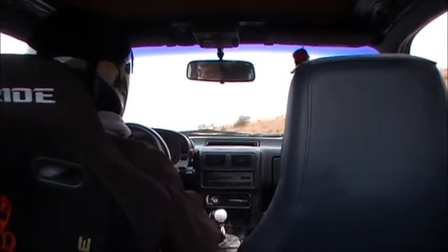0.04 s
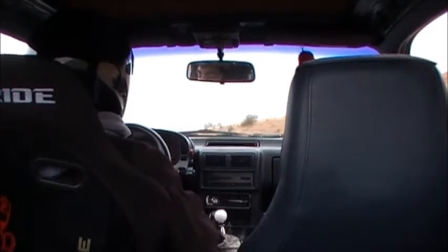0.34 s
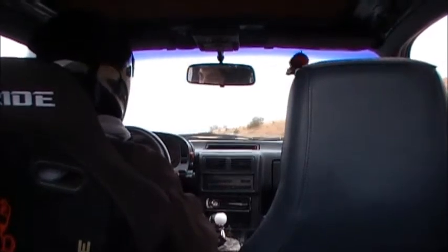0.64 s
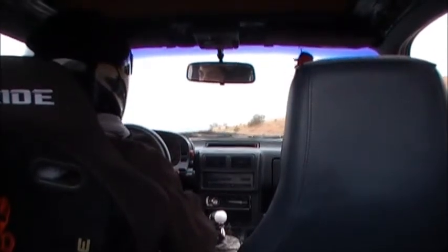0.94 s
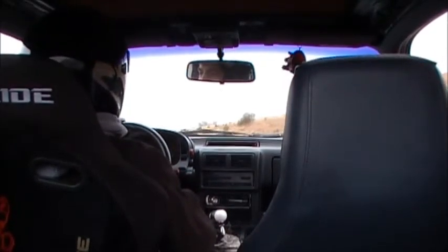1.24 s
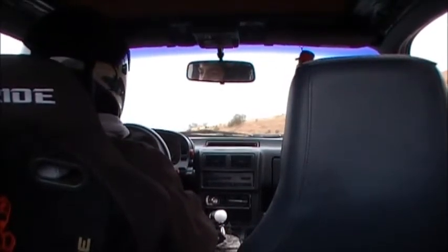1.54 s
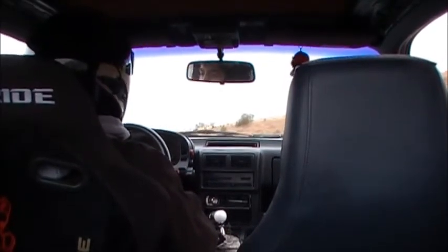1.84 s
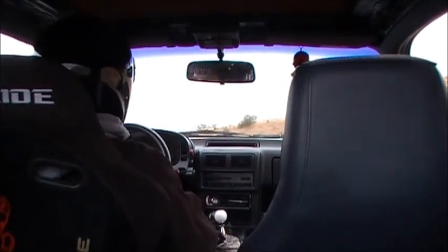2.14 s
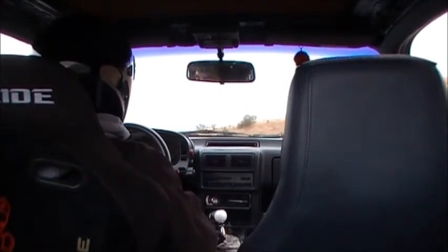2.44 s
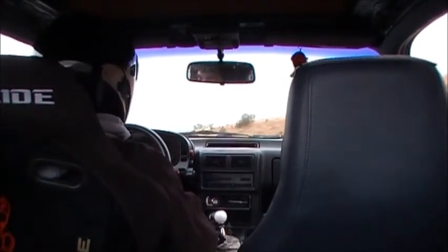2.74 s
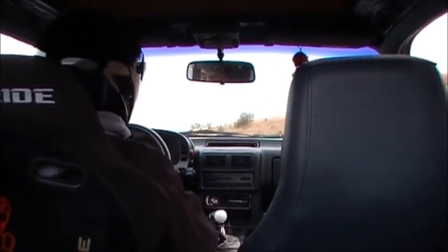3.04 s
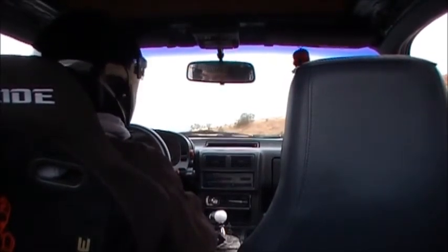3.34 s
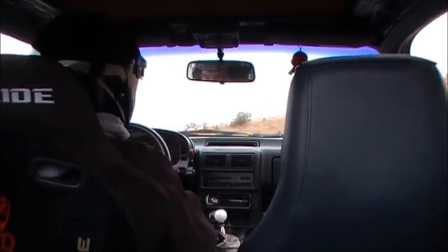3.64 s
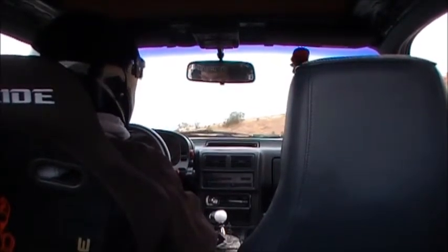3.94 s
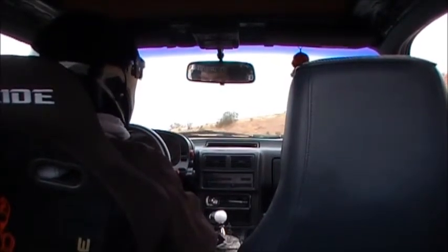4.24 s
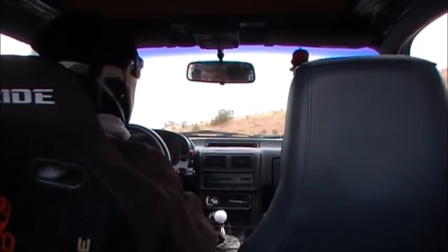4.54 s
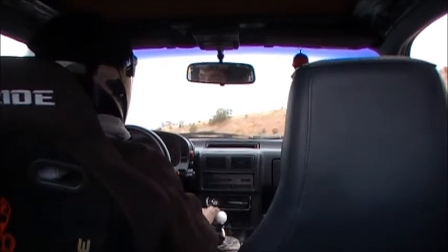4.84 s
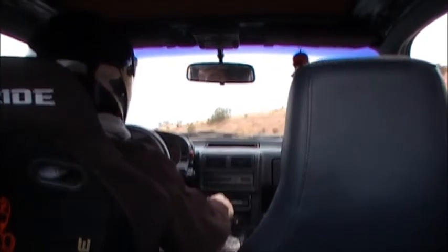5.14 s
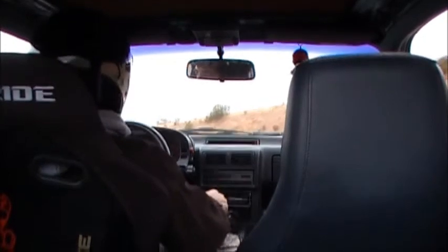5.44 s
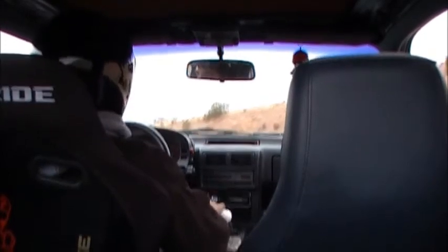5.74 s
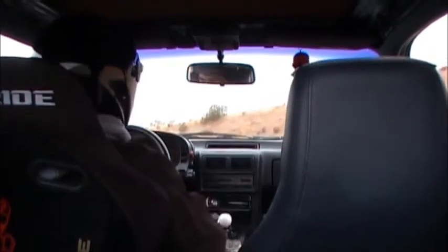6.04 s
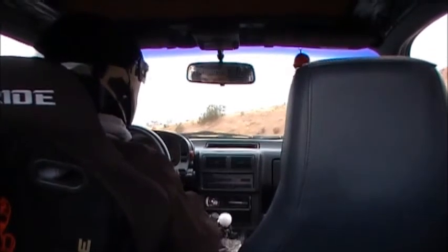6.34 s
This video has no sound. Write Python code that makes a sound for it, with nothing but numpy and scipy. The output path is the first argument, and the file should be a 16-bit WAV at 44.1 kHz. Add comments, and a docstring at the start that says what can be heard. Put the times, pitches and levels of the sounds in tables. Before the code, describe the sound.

The sound is heard inside a stripped car on a rough track. The engine starts low and burbling, and from about 0.5 to 1.7 seconds bucks in quick surges, five or six a second. Around 1.8 seconds it revs up, then holds a loud, resonant drone that creeps higher until 5.4 seconds. It drops away, pops at 5.5 and 5.9 seconds, picks up briefly and bucks again until the end at about 6.4 seconds. Throughout, tyres roar, grit hisses against the floor, the body rumbles and a fuel pump whines steadily underneath. Stones and loose trim knock here and there, most clearly near 0.3, 1.4 and 6.2 seconds. Soft low thumps from bumps come from 4 seconds on. A loose metal clip chatters lightly between 0.4 and 1.2 seconds and more strongly from 5 seconds, joined by three faint, short squeaks.

```python
"""In the back of a stripped car on a rough track, driven by a two-rotor engine.
The engine bucks on a light throttle, pulls up and holds high revs through a slide, then stumbles and pops
as the foot lifts. Its firing orders sweep through the cabin's resonances. Tyres roar and spray grit, the
body rumbles and thumps over bumps, the fuel pump whines, stones knock and a loose metal clip chatters."""
import sys
import numpy as np
from scipy import signal
from scipy.fft import rfft, irfft
from scipy.io import wavfile

SR = 44100
rng = np.random.default_rng(int(sys.argv[2]) if len(sys.argv) > 2 else 0)


def pcm_store(signal):
    """Save signal as 16-bit PCM."""
    levels = np.round(np.clip(np.atleast_2d(signal), -1, 1) * 32767)
    wavfile.write(sys.argv[1], SR, levels.astype(np.int16).T)


N = 282240
TIME = np.arange(N) / SR
BINS_HZ = np.fft.rfftfreq(N, 1 / SR)
STEP = 30  # samples per control point


# Each row: time in seconds, level of the first firing order in dB.
BOOM_LEVEL = [(0, -27.5), (.42, -25.5), (.7, -25), (2.7, -23.5), (5.45, -26), (5.63, -30), (6.08, -23.5),
              (6.4, -21.5)]
# Each row: time in seconds, engine load in dB, firing unevenness as a fraction.
ENGINE_LOAD = [(0, -16.5, 0.37), (.45, -9, 0.2), (1.55, -6, 0.34), (1.71, -1.5, 0.14), (1.83, -7.5, 0.084),
               (1.95, 0, 0.041), (2.1, 2.5, 0.045), (3.2, 3, 0.033), (3.95, 1, .04), (4.2, 3, 0.037),
               (4.33, -2, .05), (4.48, 1.5, 0.038), (5.39, 2, 0.061), (5.47, -6, 0.38), (5.57, -15, 0.17),
               (5.72, -10, 0.16), (5.85, 0.5, 0.19), (6.02, -2, 0.11), (6.15, -6.5, 0.16), (6.4, -7, 0.25)]
# Cabin modes for orders 2 and 3. Each row: centre in Hz, width in Hz, gain in dB.
DRONE_MODES = [(151, 34, -26), (210.8, 17, -23), (228.7, 16.3, -21), (255, 39, -38.5), (294, 32.6, -22.5),
               (315, 21, -27)]
# Cabin modes for higher and half orders. Each row: centre in Hz, width in Hz, gain in dB.
CABIN_MODES = [(113, 16, -28), (151.4, 22.6, -20), (181, 22, -28), (289.6, 33, -24), (370, 8.3, -54),
               (423.3, 10, -34.5), (486, 15.4, -33.5), (615.6, 26.4, -30.5), (633, 8.8, -42),
               (682, 9.9, -34), (770, 300, -42.5), (1080, 120, -46.5)]

def exhaust(firings, firing_hz, jitter=0.033, flutter=0.6, sag_db=10.5, surge_db=3.5, burble_db=4.5):
    """One pulse a firing, uneven in strength and timing; the cabin lifts orders that cross its modes."""
    load_db, uneven = curves(ENGINE_LOAD)
    boom_db, = curves(BOOM_LEVEL)
    slack, _ = bucking()
    boom = amp(boom_db - sag_db * slack ** 1.2)
    drive = amp(load_db + surge_db * surging(lead_s=0.052))
    phase = 2 * np.pi * (firings + jitter * uneven * wander(88))
    out = np.zeros(N)
    for order in range(1, 15):
        modes = DRONE_MODES if order in (2, 3) else CABIN_MODES
        level = boom if order == 1 else drive * cabin(order * firing_hz, modes)
        pipe_dispersion = np.pi * order ** 2 / 5  # higher orders arrive later
        out += level * np.cos(order * phase - pipe_dispersion)
    # on a light throttle the rotors fire unequally, adding half orders
    burble = uneven * amp(burble_db + 3 * surging(lead_s=0))
    for order in (1.5, 2.5):
        out += burble * cabin(order * firing_hz, CABIN_MODES) * np.cos(order * phase + wander(6.2))
    out *= np.sqrt(2) * (1 + flutter * uneven * wander(41))
    # low cut at 50 Hz keeps deep rumble out of the engine note
    return signal.sosfilt(signal.butter(4, 50, "high", fs=SR, output="sos"), out)


def cabin(hz, modes):
    """Gain of the cabin resonances along a moving frequency."""
    gain = sum(amp(db) / (1 + (2 * (hz[::STEP] - centre) / width) ** 2) for centre, width, db in modes)
    return np.interp(TIME, TIME[::STEP], gain)


# Each row: first surge in seconds, end in seconds, initial surge rate in Hz.
BUCK_SPELLS = [(0.51, 1.73, 5.16), (6.092, 6.448, 5.8)]

def bucking(lead_s=0., quicken_hz_per_s=0.94, fade_s=0.11):
    """The driveline winds up and lets go. Returns slack (0 at a surge, 1 between) and extent (0 to 1)."""
    slack, extent = np.zeros(N), np.zeros(N)
    for start, end, rate_hz in BUCK_SPELLS:
        t = TIME + lead_s - start
        gate = np.clip(np.minimum(t + fade_s, end - start - t) / fade_s, 0, 1)
        cycles = rate_hz * t + quicken_hz_per_s * t ** 2 / 2
        slack += gate * np.sin(np.pi * cycles) ** 2
        extent += gate
    return slack, extent


def surging(lead_s):
    """Bucking as a swing about zero: +1 at a surge, -1 in the slack."""
    slack, extent = bucking(lead_s)
    return extent - 2 * slack


# Each row: frequency in Hz, relative level in dB.
RUSH_SPECTRUM = [(150, -51), (280, -0.5), (380, 0.5), (500, 3), (660, -3.5), (830, -3.5), (1100, -19),
                 (2000, -36.5)]

def gas_rush(firings, db, pulsing=0.16):
    """Exhaust gas puffs out with each firing."""
    puffs = 1 + pulsing * np.cos(2 * np.pi * firings)
    return amp(db) * colour(stereo_noise() * puffs, RUSH_SPECTRUM)


# Each row: start in seconds, level in dB.
FUEL_POPS = [(5.498, -13), (5.9, -14)]

def pops(pipe_hz=135, rise_s=0.007):
    """Unburnt fuel pops in the exhaust and rings the pipe for a few cycles."""
    t, out = np.arange(SR // 10) / SR, np.zeros(N)
    pop = t / rise_s * np.exp(1 - t / rise_s) * np.sin(2 * np.pi * pipe_hz * t)
    for start, db in FUEL_POPS:
        add(out, start, amp(db) * pop)
    return out


# Each row: frequency in Hz, relative level in dB.
TYRE_SPECTRUM = [(100, -10), (280, -3.5), (450, -8.5), (660, -1), (830, 0), (1050, 1), (1350, -3),
                 (1800, -6.5), (2500, -12.5), (3500, -18), (5000, -29), (9000, -35.5)]

def tyre_roar(db, bite, gain_db=1.5, bite_db=2.5, flutter_db=1.5):
    """Tyres scrub over the track, their grip fluttering."""
    scrub = stereo_noise() * amp(flutter_db * wander(41))
    return amp(db + gain_db + bite_db * bite) * colour(scrub, TYRE_SPECTRUM)


# Each row: frequency in Hz, relative level in dB.
GRIT_SPECTRUM = [(1500, -3), (3000, 0), (4000, 0.5), (5200, -1), (6500, -0.5), (7600, 2), (9000, 1.5),
                 (9700, -4.5), (11500, -5), (13000, -9), (14500, -61)]

def grit(db, bite, gain_db=1.0, bite_db=0.8, grains_per_s=1500, size_db=2.5, flutter_db=0.97):
    """Sand sprays the floor pan: a hiss with single grains in it."""
    sizes = amp(size_db * np.minimum(rng.exponential(1, (2, N)), 5))
    signs = rng.choice([-1, 1], (2, N))
    hits = rng.random((2, N)) < grains_per_s / SR
    spray = stereo_noise() + 0.51 * unit(sizes * signs * hits)
    spray *= amp(flutter_db * wander(48))
    return amp(db + gain_db + bite_db * bite) * colour(spray, GRIT_SPECTRUM)


# Each row: frequency in Hz, relative level in dB.
SHELL_SPECTRUM = [(10, -40), (35, -38), (55, -14.5), (80, 0), (125, -5), (155, 2), (190, -7.5), (240, -3.5),
                  (340, -6), (500, -13), (1000, -61)]

def body_rumble(db):
    """Rough ground drums the body shell."""
    return amp(db) * colour(stereo_noise(), SHELL_SPECTRUM)


# Each row: peak time in seconds, relative level in dB.
TRACK_BUMPS = [(3.97, -6), (4.279, -7), (4.659, -7), (5.039, -11), (5.903, -13), (6.207, -9.5)]
# Each row: frequency in Hz, relative level in dB.
THUMP_SPECTRUM = [(30, -35), (60, -4), (85, -4), (120, 0), (160, 0.5), (220, -1.5), (500, -37), (1000, -60)]

def bumps(gain_db=-9.5, rise_s=0.034):
    """Each bump shakes a short low boom from the shell."""
    t, envelope = np.arange(SR // 4) / SR, np.zeros(N)
    swell = t / rise_s * np.exp(1 - t / rise_s)
    for peak_s, db in TRACK_BUMPS:
        add(envelope, peak_s - rise_s, amp(db + gain_db) * swell)
    return envelope * colour(stereo_noise(), THUMP_SPECTRUM) / 2


# Each row: time in seconds, shaft speed in Hz.
PUMP_SPEED = [(0, 180.7), (.8, 181), (2, 181.1), (4.2, 181), (5.2, 181.4), (6.4, 181.1)]
# Each row: time in seconds, base level in dB.
PUMP_LEVEL = [(0, -33), (1.57, -29), (1.81, -38), (2.23, -29), (2.5, -33), (2.7, -29), (3.56, -29),
              (4.38, -31), (5.3, -28), (5.6, -30.5), (6.3, -28)]
# Each row: shaft order, relative level in dB.
SHAFT_ORDERS = [(1, -8.5), (2, -8), (3, -10.5), (4, 0.5), (5, -9.5), (6, -13), (7, -14), (8, -15),
                (9, -19.5), (10, -19), (12, -20)]

def fuel_pump(shake_rad=0.018):
    """The electric pump's shaft orders waver as the car shakes; the fourth is strongest and steadiest."""
    shaft_hz, = curves(PUMP_SPEED)
    fourth_db, = curves(PUMP_LEVEL)
    others_db = fourth_db.mean() + 0.85 * (fourth_db - fourth_db.mean())
    angle = 2 * np.pi * np.cumsum(shaft_hz) / SR + shake_rad * wander(11)
    out = np.zeros(N)
    for order, order_db in SHAFT_ORDERS:
        base_db, waver = (fourth_db, 0.042) if order == 4 else (others_db, 0.25)
        phase = order * angle + waver * wander(1.3) + rng.uniform(0, 2 * np.pi)
        out += amp(base_db + order_db) * (1 + waver * wander(8.7)) * np.cos(phase)
    return np.sqrt(2) * out


# Each row: start in seconds, level in dB, centre in Hz, spread in octaves, T60 in seconds.
BODY_HITS = [(.066, -29.5, 2240, 0.64, 0.062), (0.279, -27, 1090, .5, 0.14),
             (0.679, -30, 6500, 0.59, 0.054), (1.04, -43, 2300, .6, .1), (1.355, -23, 1600, 0.69, 0.086),
             (1.562, -39, 3270, 0.33, .07), (2.798, -29.5, 7500, .4, 0.064), (2.877, -31.5, 6400, .4, .05),
             (4.005, -31, 4500, 0.67, .05), (5.031, -31, 5000, 0.83, .06), (5.432, -32, 5000, .8, 0.071),
             (5.683, -31.5, 5500, 0.71, .07), (6.228, -23.5, 8900, 0.083, 0.038),
             (6.229, -21.5, 1900, 1.2, 0.041)]

def knocks(rise_s=0.0023):
    """Stones and loose trim hit the body, each clattering in its own band."""
    t, out = np.arange(SR // 5) / SR, np.zeros((2, N))
    hz = np.fft.rfftfreq(len(t), 1 / SR) + 1
    for start, db, centre_hz, octaves, t60 in BODY_HITS:
        noise = rng.standard_normal(len(t)) + 0.55 * rng.standard_normal((2, len(t)))
        band = np.exp(-0.5 * (np.log2(hz / centre_hz) / octaves) ** 2)
        clatter = unit(irfft(rfft(noise) * band, len(t)))
        envelope = amp(db - 60 * t / t60) * (1 - np.exp(-t / rise_s))
        add(out, start, clatter * envelope)
    return out


# Each row: start in seconds, end in seconds, strike chance per shake, base level in dB.
CLIP_SPELLS = [(.387, .56, .5, -40), (0.64, .99, 1, -34), (1.081, 1.24, .8, -40), (4.777, 4.95, .6, -41),
               (5.029, 6.4, 0.73, -29.5)]
TICK_MODES = [(9680, -7, .009), (9900, 12.5, 0.0057), (10000, 2.5, 0.0071)]
FALL_MODES = [(5613, 5.5, 0.022), (5713, 9, 0.015)]

def clip_chatter(shake_hz=27.4, tick_db=2.5, fall_db=-4, fall_s=0.0071, scatter_db=0.1, jitter_s=0.0022):
    """With each shake the loose clip may tick against one stop and fall back on the other."""
    out = np.zeros((2, N))
    for start, end, chance, db in CLIP_SPELLS:
        for shake_s in np.arange(start, end, 1 / shake_hz):
            tick_gain, fall_gain = amp(rng.normal([tick_db, fall_db], scatter_db))
            strike_s = rng.normal(shake_s, jitter_s)
            strength = amp(db) * (rng.random() < chance)
            add(out, strike_s, strength * tick_gain * ring(TICK_MODES, rise_s=0.0015))
            add(out, strike_s + fall_s, strength * fall_gain * ring(FALL_MODES, rise_s=0.0016))
    return out


def ring(modes, rise_s, detune=0.0039):
    """Decaying modes of struck metal, differing in phase left and right."""
    t, tones = np.arange(SR // 20) / SR, 0
    for hz, db, t60 in modes:
        cycles = hz * rng.normal(1, detune) * t + rng.random((2, 1)) / 2
        tones += amp(db - 60 * t / t60) * np.sin(2 * np.pi * cycles)
    return tones * (1 - np.exp(-(t / rise_s) ** 2))


# Each row: start in seconds, length in seconds, level in dB.
RUBS = [(5.295, .065, -40), (5.62, .055, -41), (6.316, .1, -40)]

def squeaks(hz=3250, waver=0.0085):
    """Something rubs and sings briefly on one note."""
    envelope = np.zeros(N)
    for start, length_s, db in RUBS:
        add(envelope, start, amp(db) * signal.windows.hann(int(length_s * SR)) ** 0.7)
    pitch_hz = hz * (1 + waver * wander(75))
    return envelope * np.sin(2 * np.pi * np.cumsum(pitch_hz) / SR)


# Each row: frequency in Hz, level in dB.
WHISTLE_TONES = [(1314, -45.5), (1497, -50), (3800, -58.5), (7472, -60), (8597, -59), (9098, -60.5),
                 (10864, -66)]

def whistles(half_width_hz=14):
    """Thin fuzzy tones, different left and right."""
    peaks = sum(amp(db) * unit(1 / (1 + ((BINS_HZ - hz) / half_width_hz) ** 2))
                for hz, db in WHISTLE_TONES)
    return irfft(rfft(stereo_noise()) * peaks, N)


def amp(db):
    """Decibels to gain."""
    return 10 ** (np.asarray(db) / 20)


def unit(x):
    """Scales to unit rms."""
    return x / np.sqrt(np.mean(x ** 2) + 1e-20)


def curves(rows):
    """Each value column of a timed table, per sample."""
    seconds, *columns = np.transpose(rows)
    return [np.interp(TIME, seconds, column) for column in columns]


def per_bin(rows):
    """A frequency table per FFT bin, interpolated on a log axis."""
    hz, values = np.transpose(rows)
    return np.interp(np.log(BINS_HZ + 1), np.log(hz + 1), values)


def add(mix, start_s, sound):
    """Mixes a sound in at start_s."""
    part = mix[..., max(round(start_s * SR), 0):][..., :sound.shape[-1]]
    part += sound[..., :part.shape[-1]]


def wander(cutoff_hz):
    """Low-passed random drift of unit rms."""
    size = len(TIME[::STEP])
    rolloff = 1 + (np.fft.rfftfreq(size, STEP / SR) / cutoff_hz) ** 4
    drift = irfft(rfft(rng.standard_normal(size)) / rolloff, size)
    return np.interp(TIME, TIME[::STEP], unit(drift))


def stereo_noise():
    """Two independent white noises."""
    return rng.standard_normal((2, N))


# Each row: frequency in Hz, left-right correlation.
STEREO_CORRELATION = [(50, 0.93), (150, 0.97), (500, 0.85), (1000, 0.72), (2500, 0.73), (5000, 0.74),
                      (8000, 0.52), (14000, 0.045)]

def colour(pair, spectrum):
    """Gives two independent signals a spectrum and a left-right correlation, at unit rms."""
    mid, side = rfft(pair) * amp(per_bin(spectrum))
    correlation = per_bin(STEREO_CORRELATION)
    mid *= np.sqrt(1 + correlation)
    side *= np.sqrt(1 - correlation)
    return unit(irfft(np.array([mid + side, mid - side]), N))


def pan(x, left_db):
    """Sets the left channel left_db above the right."""
    return x * amp(np.array([[left_db], [-left_db]]) / 2)


# Each row: time in seconds, firing rate in Hz.
FIRING_RATE = [(0, 80), (.3, 74.2), (.6, 71.6), (1, 69.9), (1.6, 69.1), (1.76, 74), (1.95, 97),
               (2.05, 102.3), (2.14, 104.2), (2.4, 97.8), (2.6, 100.2), (2.9, 100.5), (3.2, 101.9),
               (4, 104.4), (4.8, 105.6), (5.35, 106.4), (5.6, 101.5), (5.8, 99.3), (6.02, 101.3), (6.4, 95)]
# Each row: time in seconds, base levels of tyre roar and grit in dB.
ROAD_LEVELS = [(0, -31.5, -47), (.18, -38.5, -49.5), (.3, -35.5, -46.5), (.6, -37, -45.5), (.85, -35, -44),
               (1.35, -33, -44), (1.68, -35.5, -44.5), (1.84, -40, -52), (2.14, -29.5, -42),
               (2.42, -34, -44.5), (2.75, -30, -42), (3, -33.5, -44), (4.22, -29, -41), (4.35, -36, -45.5),
               (4.45, -31.5, -43), (5.44, -30.5, -41), (5.55, -35, -44), (5.75, -32.5, -42),
               (6.4, -33, -42.5)]
# Each row: time in seconds, levels of body rumble and gas rush in dB.
RUMBLE_RUSH_LEVELS = [(0, -32.5, -39), (.6, -36, -37), (1.5, -28.5, -37.5), (1.8, -33, -34),
                      (2.1, -33, -33), (2.6, -31.5, -32.5), (3.5, -28, -29), (4.6, -29, -30),
                      (5.4, -28, -29), (5.6, -28, -38), (5.9, -25.5, -30.5), (6.4, -28, -33)]

def scene():
    """Engine, road, pump and rattles inside the cabin."""
    firing_hz, = curves(FIRING_RATE)
    roar_db, grit_db = curves(ROAD_LEVELS)
    rumble_db, rush_db = curves(RUMBLE_RUSH_LEVELS)
    firings = np.cumsum(firing_hz) / SR
    bite = surging(lead_s=0.023)  # the tyres bite with each surge
    engine = pan(exhaust(firings, firing_hz) + pops(), left_db=2.0) + gas_rush(firings, rush_db)
    body = pan(body_rumble(rumble_db) + bumps(), left_db=-1.5)
    tyres = tyre_roar(roar_db, bite) + grit(grit_db, bite)
    whine = pan(fuel_pump(), left_db=-2.0) + whistles()
    return engine + body + tyres + whine + knocks() + squeaks() + clip_chatter()


def record(dry):
    """Low-pass at 14.5 kHz."""
    low_pass = signal.firwin(511, 14500, window=("kaiser", 9), fs=SR)
    return signal.oaconvolve(dry, low_pass[None], "same")


dry = scene()
out = record(dry)
pcm_store(out)
```